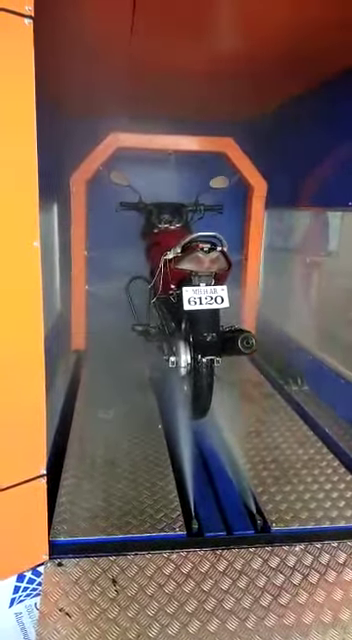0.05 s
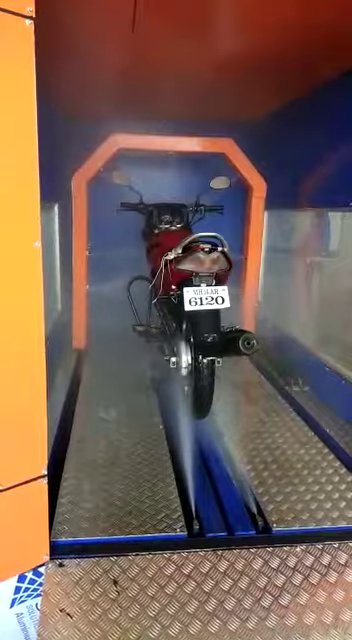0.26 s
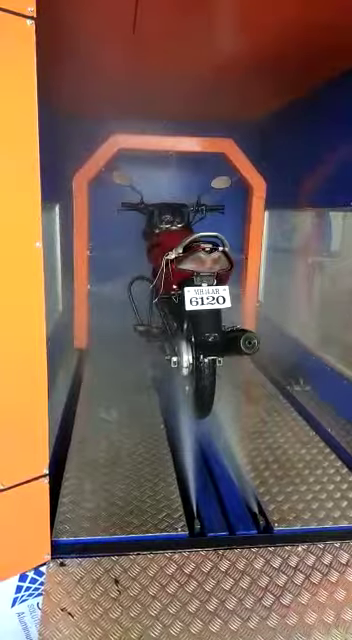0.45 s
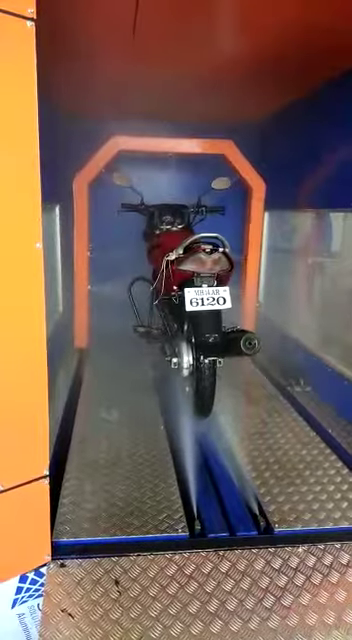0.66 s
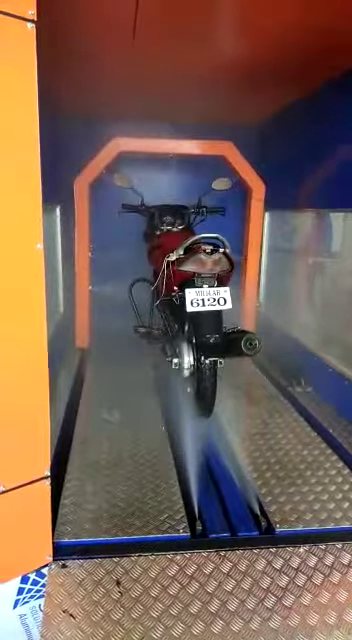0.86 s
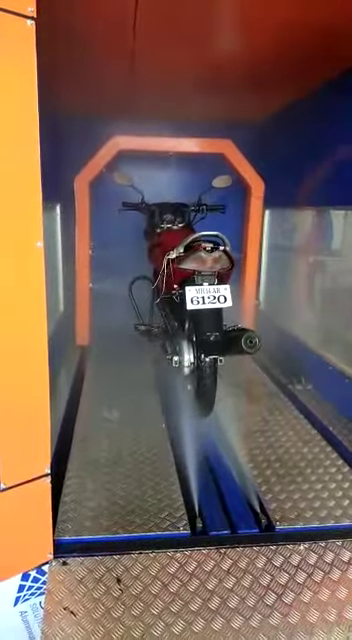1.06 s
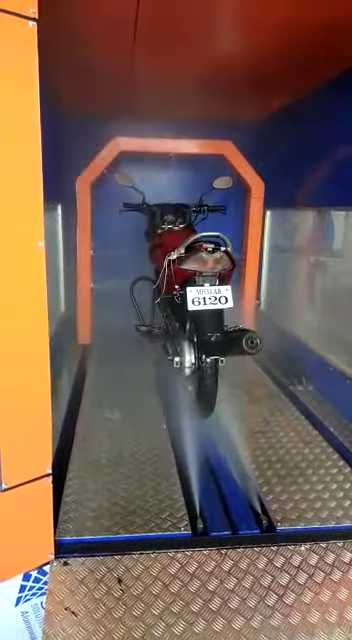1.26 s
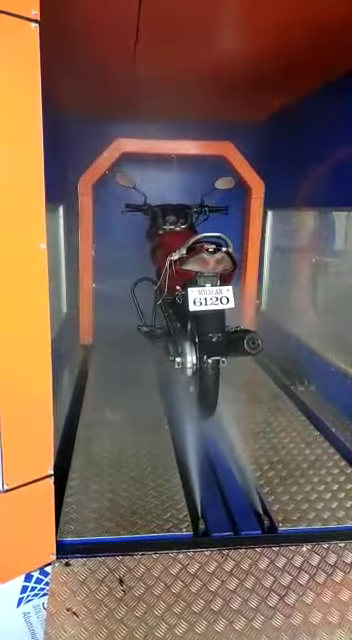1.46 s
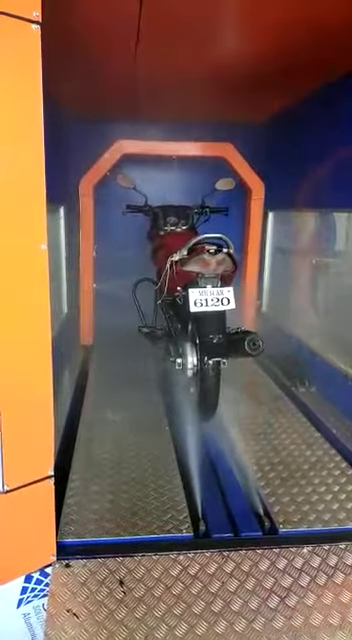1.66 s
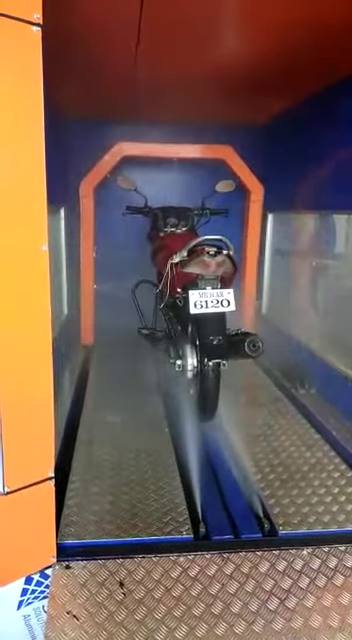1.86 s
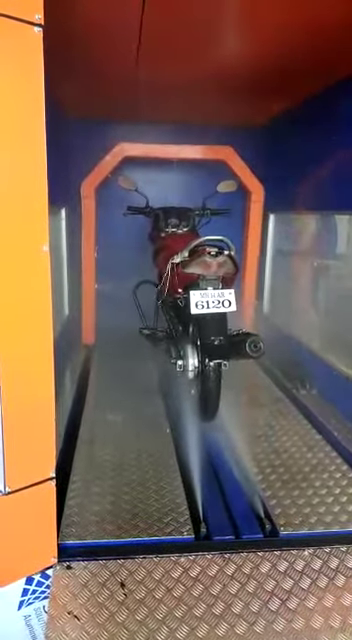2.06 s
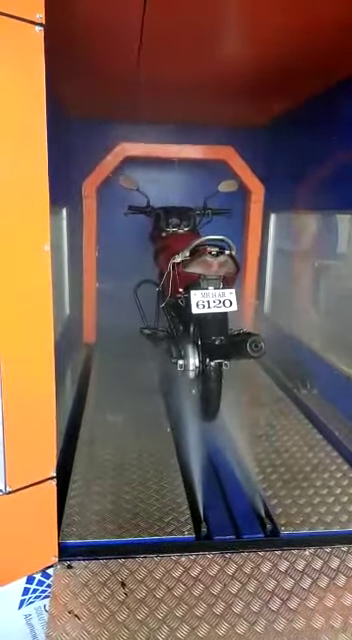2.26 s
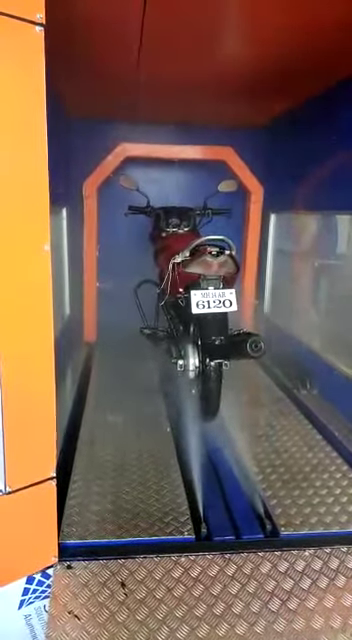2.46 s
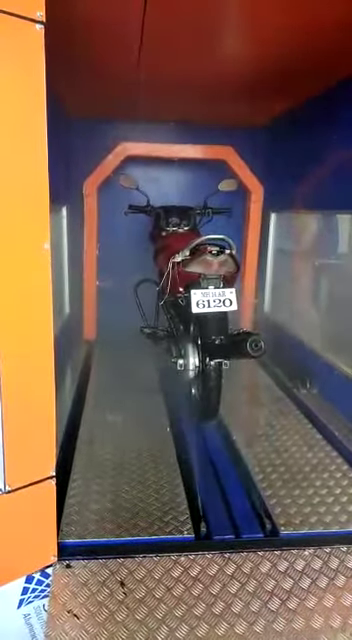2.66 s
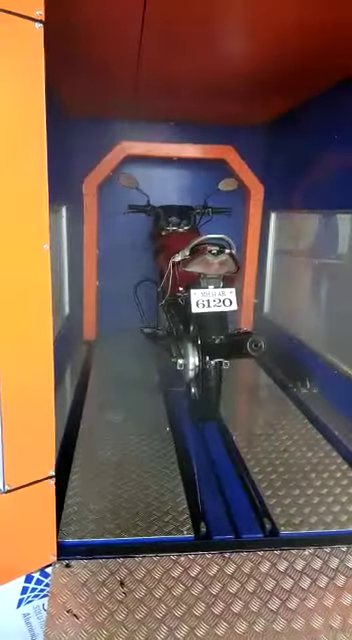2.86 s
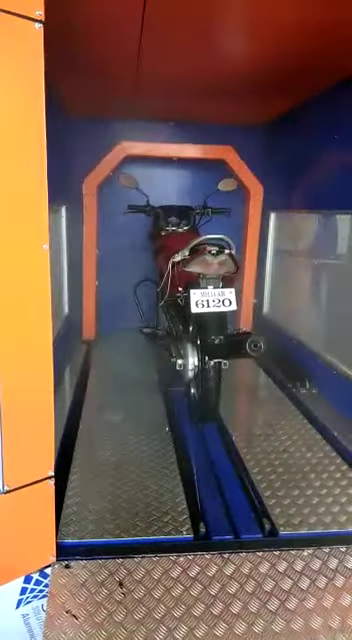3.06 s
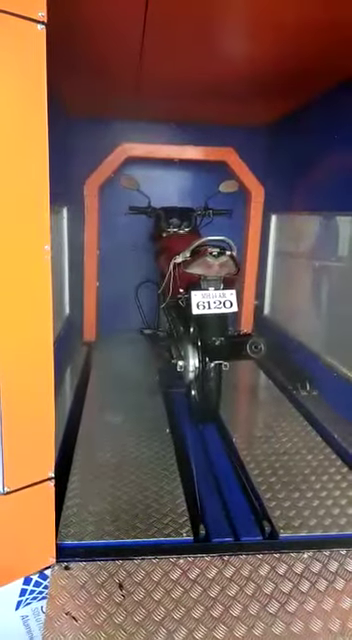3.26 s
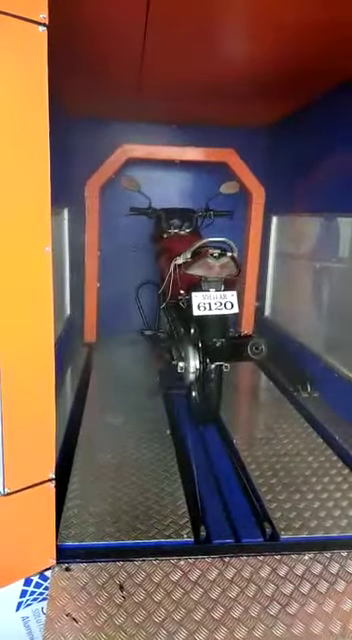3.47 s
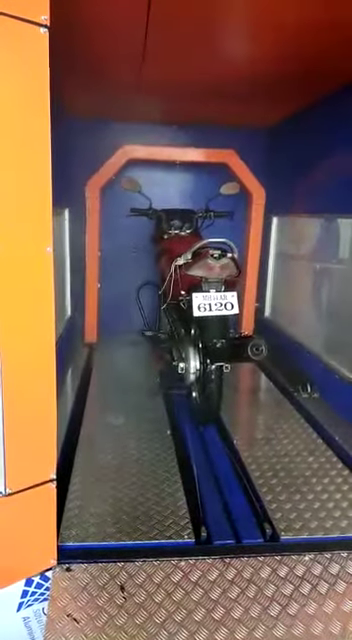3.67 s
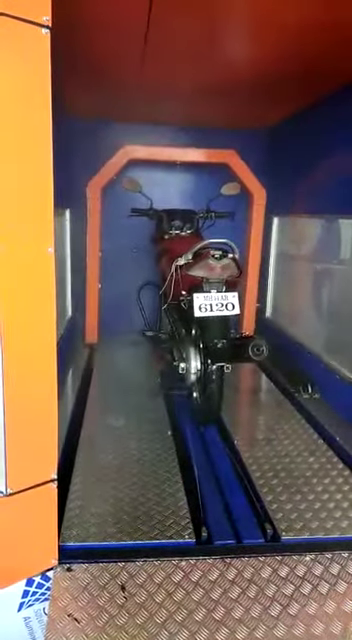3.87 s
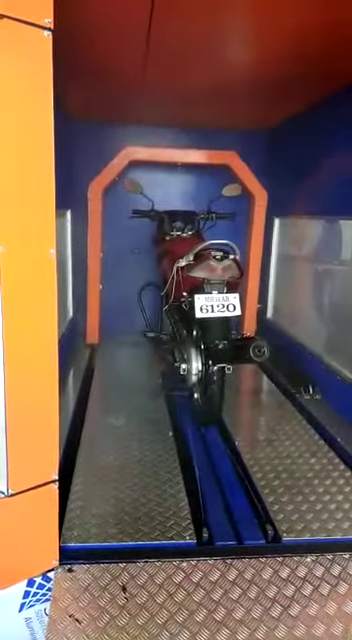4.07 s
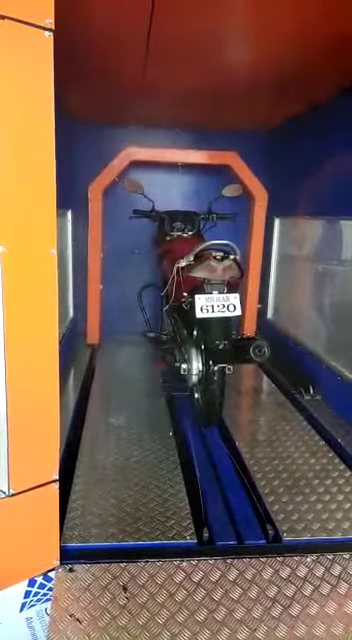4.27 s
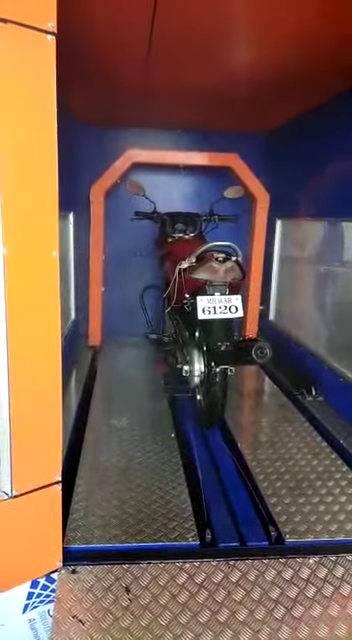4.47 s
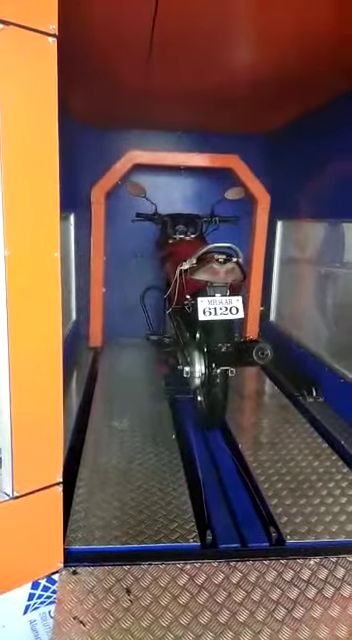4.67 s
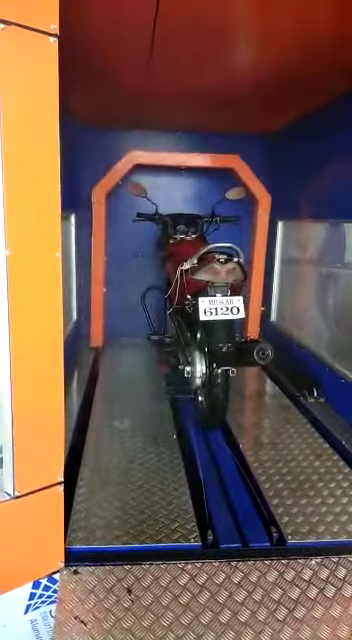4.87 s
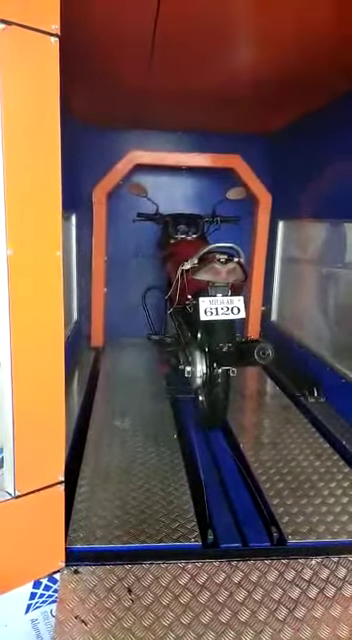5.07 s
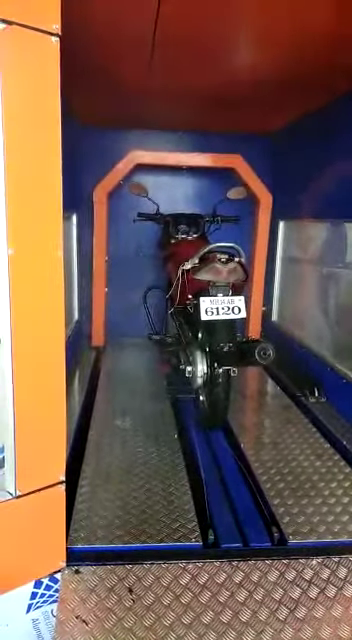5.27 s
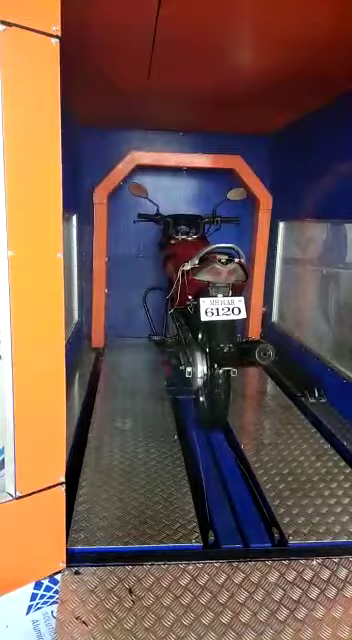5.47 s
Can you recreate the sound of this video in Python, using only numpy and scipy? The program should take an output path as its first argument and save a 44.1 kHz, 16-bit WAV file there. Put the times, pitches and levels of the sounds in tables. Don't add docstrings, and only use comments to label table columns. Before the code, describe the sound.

From 0 to 2.3 s, a motorcycle is washed in a resonant steel booth: very bright, dense jet hiss dominates, steady with slight flutter, over coarser spray drumming on metal and a low, boomy pump roar with a faint whine. At about 2.32 s a short, hard valve thump comes with a brief burst of louder hiss. The roar drops away almost at once, leaving a dull reverberant tail, while a mid-high vent blow-off fades and stops near 2.6 s. Faint pipe hums sound until 3 s. The hiss dips, recovers, then sags to its weakest at 3.3 s before returning by 3.7 s as a thin, high bleed with faint drips. A very distant fan tone swells around 4 s. Four far hammer blows on steel follow at roughly 4.1, 4.4, 4.7 and 4.9 s, the first dull, the third pinging, the last brightest, ringing through the hall until the end at 5.5 s.

```python
import sys
import numpy as np
from scipy import signal
from scipy.fft import rfft, irfft, next_fast_len
from scipy.io import wavfile
from scipy.ndimage import uniform_filter1d, map_coordinates

SR = 44100
rng = np.random.default_rng(int(sys.argv[2]) if len(sys.argv) > 2 else 0)


def undo_db(level):
    steps = np.asarray(level, float) / 20
    return 10 ** steps


def transcribe(u):
    v = np.clip(np.atleast_2d(u).T, -1, 1)
    q = np.round(v * 32767).astype(np.int16)
    wavfile.write(sys.argv[1], SR, q)


N = 242991
SHUT_S = 2.335

# (time [s], level [dB])
PRESSURE = [(0, -15.5), (2.318, -15.5), (2.328, -9.5), (2.39, -12.5), (2.49, -20), (2.62, -16),
            (2.75, -16.5), (3.08, -19.5), (3.24, -23.5), (3.33, -27.5), (3.67, -19.5), (4.1, -20),
            (4.17, -18.5), (4.7, -19), (4.83, -17.5), (5.22, -18), (5.51, -16.5)]
# (time [s], level [dB], brightness [dB], ping [dB], boom [dB])
BLOWS = [
    (4.125, -31.5, -1.5, -8, -8.5),
    (4.405, -31.5, -1, -5.5, -18),
    (4.67, -31.5, 1, 1.5, -9),
    (4.925, -31, 4, -4, -10),
]


def unit(x):
    return x / np.sqrt(np.mean(x ** 2) + 1e-20)


def since(s):
    return np.clip(np.arange(N) / SR - s, 0, None)


def along(points, hz):
    f, v = np.transpose(points)
    return np.interp(np.log(hz + 1), np.log(f + 1), v)


def curves(rows, **ends):
    s, *cols = np.transpose(rows)
    return [np.interp(np.arange(N) / SR, s, c, **ends) for c in cols]


def wobble(rate):
    knots = rng.standard_normal(int(N * rate / SR) + 4)
    return map_coordinates(knots, [np.arange(N) * rate / SR])


def peaks(modes, hz):
    return sum(undo_db(2 * db) / (1 + (2 * (hz - c) / w) ** 2) for c, w, db in modes)


def patches(pair, depth_db):
    z = signal.stft(pair, nperseg=512)[2]
    field = rng.standard_normal(z.shape[1:])
    field = uniform_filter1d(field, size=6, axis=0)
    field = uniform_filter1d(field, size=12, axis=1)
    return signal.istft(z * undo_db(depth_db * unit(field)), nperseg=512)[1][:, :N]


def rush(gain, patchy_db=None):
    # (frequency [Hz], left-right correlation [-1 to 1])
    alike = [(60, .94), (130, .95), (290, .84), (640, .46), (1410, -.05), (3100, 0), (15000, 0)]
    # (frequency [Hz], left minus right [dB])
    port_lean = [(60, 1), (110, -0.5), (200, 0), (380, 2.5), (700, -1), (1290, 0.5), (2380, -1),
                 (4400, 1.5), (8120, 2.5), (15000, 7)]
    pair = rng.standard_normal((2, N))
    if patchy_db:
        pair = patches(pair, patchy_db)
    m = next_fast_len(N + 8192, real=True)
    hz = np.fft.rfftfreq(m, 1 / SR)
    turn = np.arccos(np.clip(along(alike, hz), -1, 1)) / 2
    mid, side = rfft(pair, m) * gain(hz) * [np.cos(turn), np.sin(turn)]
    lean = undo_db(along(port_lean, hz) / 2)
    ports = irfft(np.array([(mid + side) * lean, (mid - side) / lean]), m)[:, :N]
    return ports / np.std(ports.mean(axis=0))


def nozzles():
    # (frequency [Hz], density [dB per Hz])
    jet_spectrum = [(1000, -120), (3800, -20), (6500, -15), (9000, -5.5), (10800, 1.5), (12300, 2),
                    (13700, -1.5), (14600, -5.5), (15700, -6), (17000, -11.5)]
    # (frequency [Hz], density [dB per Hz])
    bleed_spectrum = [(1000, -120), (3800, -23.5), (6500, -13.5), (8700, -8.5), (11500, 2.5), (13200, 0),
                      (15100, -4), (16000, -3.5), (17000, -14)]
    # (frequency [Hz], density [dB per Hz])
    splash_spectrum = [(710, -39), (1200, -10.5), (2660, -5), (2940, -3), (3400, -3.5), (3730, -1.5),
                       (4120, -1.5), (7500, 1), (9750, -3.5), (16500, -120)]
    # (frequency [Hz], density [dB per Hz])
    vent_spectrum = [(2000, -60), (3200, -5), (3700, 3), (5500, 1.5), (6500, -24), (9000, -40),
                     (14000, -120)]
    jets_pan_db, bleed_pan_db = -1.2, -0.05
    splash_db, drips_db, drain_s = -24.5, -33.5, .3
    vent_open_s, vent_db, vent_fade_db_per_s = 0.023, -28.5, 17
    vent_close_s, vent_close_db_per_s = 2.6, 220
    dry_s = 0.055

    hiss_db, = curves(PRESSURE)
    pressure = wobble(12)
    shut = np.clip(since(SHUT_S) / .26, 0, 1)
    jets = np.sqrt(1 - shut) * rush(lambda hz: undo_db(along(jet_spectrum, hz)), patchy_db=1.0)
    bleed = np.sqrt(shut) * rush(lambda hz: undo_db(along(bleed_spectrum, hz)), patchy_db=.5)
    pan_db = jets_pan_db + (bleed_pan_db - jets_pan_db) * shut
    pan_db = pan_db * np.array([[.5], [-.5]])
    hiss = undo_db(hiss_db + pan_db + 0.31 * pressure + 0.27 * wobble(40)) * (jets + bleed)

    wet = np.exp(-since(SHUT_S) / drain_s - since(vent_close_s) / dry_s)
    water_db = drips_db + (splash_db - drips_db) * wet
    water_db = water_db + 0.44 * (hiss_db - hiss_db[0])
    water_level = undo_db(water_db + 0.38 * pressure + 0.4 * wobble(15))
    splash = water_level * rush(lambda hz: undo_db(along(splash_spectrum, hz)), patchy_db=0.92)

    opened = np.clip(since(SHUT_S - vent_open_s) / vent_open_s, 0, 1) ** 2
    fading_db = vent_fade_db_per_s * since(SHUT_S) + vent_close_db_per_s * since(vent_close_s)
    vent_level = opened * undo_db(vent_db - fading_db)
    vent = vent_level * rush(lambda hz: undo_db(along(vent_spectrum, hz)))
    return hiss + splash + vent


def pump():
    # (frequency [Hz], density [dB per Hz])
    roar_spectrum = [(15, -63), (25, -19), (70, -23), (128, -6.5), (222, -2.5), (266, -6), (303, -0.5),
                     (398, -5), (461, -4.5), (534, -6), (978, -5), (1200, -10.5), (2000, -10.5),
                     (2600, -22), (4400, -120)]
    # (centre [Hz], width [Hz], level [dB])
    booth_modes = [(107, 6, 4), (143, 12, 2), (213, 12, 3), (233, 7, 6), (297, 7, 10), (340, 14, 4),
                   (457, 7, 9), (474, 8, 6), (511, 9, 5), (769, 10, 5), (1011, 12, 4)]
    # (frequency [Hz], level over the roar [dB])
    whine_tones = [(297.8, -12), (458, -15.5), (232.8, -16.5)]
    running_db, rundown_db = -28, -39
    kick_db, kick_s = 1.5, .03
    stop_t60, rundown_t60 = 0.16, 3.1

    after = since(SHUT_S - .01)
    kick = kick_db * np.clip(since(SHUT_S - kick_s) / kick_s, 0, 1)
    stopping = undo_db(running_db + kick - 60 * after / stop_t60)
    rundown = undo_db(rundown_db - 60 * after / rundown_t60)
    level = np.maximum(stopping, rundown)

    def boomy(hz):
        return undo_db(along(roar_spectrum, hz)) * np.sqrt(1.17 + peaks(booth_modes, hz))

    def deep(hz):
        return 1 / (1 + (hz / 170) ** 4)

    stopped = np.clip((np.arange(N) / SR - 2.325) / .03, 0, 1)
    motor = undo_db(-8.0 - 9.8 * stopped) * rush(lambda hz: boomy(hz) * np.sqrt(deep(hz)))
    drumming = undo_db(-1.2) * rush(lambda hz: boomy(hz) * np.sqrt(1 - deep(hz)))
    whine = np.zeros(N)
    for hz, db in whine_tones:
        whine += undo_db(db) * np.sin(2 * np.pi * hz * np.arange(N) / SR + 0.84 * wobble(6))
    return level * undo_db(0.056 * wobble(5.86)) * (motor + drumming + whine)


def workshop():
    # (frequency [Hz], density [dB per Hz])
    air_spectrum = [(15, -65), (25, -52), (142, -6), (178, -6), (200, -5), (409, -2.5), (589, -7.5),
                    (743, -5), (1010, -4), (2500, -11), (3250, -27), (5500, -120)]
    air_db, stir_db, stir_t60 = -45.5, -34.5, 1.73
    fill_db, fill_s = 2, 0.36
    fan_s, fan_loudest_db = 4.08, -51.5
    fan_up_s, fan_down_s = 0.61, .6

    pressure_db, = curves(PRESSURE)
    calm_db = air_db + .3 * (pressure_db - pressure_db[0])
    calm_db = calm_db + fill_db * np.clip(since(BLOWS[0][0]) / fill_s, 0, 1)
    stirred = (since(SHUT_S) > 0) * undo_db(stir_db - 60 * since(SHUT_S) / stir_t60)
    air_level = np.hypot(undo_db(calm_db), stirred) * undo_db(0.29 * wobble(5.12))
    air = air_level * rush(lambda hz: undo_db(along(air_spectrum, hz)), patchy_db=2.0)

    off = np.arange(N) / SR - fan_s
    fan_fall = np.where(off < 0, (off / fan_up_s) ** 2, np.sqrt(np.abs(off) / fan_down_s))
    fan = undo_db(fan_loudest_db - 10 * fan_fall) * rush(lambda hz: peaks([(790, 184, 0)], hz))
    return air + fan


def valve():
    # (time [s], peak [dB], thump [Hz], t60 [s])
    slams = [
        (2.3169, -8.5, 620, 0.0046),
    ]
    # (start [s], end [s], frequency [Hz], level [dB])
    hums = [
        (2.407, 2.573, 128, -47.5),
        (2.63, 2.777, 129, -50.5),
        (2.794, 3.02, 340, -47),
    ]
    now, out = np.arange(N) / SR, np.zeros(N)
    for s, db, hz, t60 in slams:
        t = since(s)
        onset = 1 - np.exp(-t / 0.00055)
        out -= undo_db(db + 8.5 - 60 * t / t60) * np.sin(2 * np.pi * hz * t) * onset
    for start, end, hz, db in hums:
        swell = np.sin(np.pi * np.clip((now - start) / (end - start), 0, 1)) ** .5
        tone = np.sin(2 * np.pi * hz * now + 0.77 * wobble(13))
        out += undo_db(db + 2 + 1.2 * wobble(25.0)) * swell * tone
    return out


def hammer():
    # (centre [Hz], width [Hz], level [dB])
    steel_modes = [(606, 94, -4), (796, 140, -5), (1030, 120, -8.5), (1490, 490, -8.5), (2000, 230, -2),
                   (2410, 330, -1)]
    # (centre [Hz], width [Hz], level [dB])
    boom_modes = [(192, 19, -5), (270.8, 3.2, 5.5), (291, 12, 1), (315, 16, 0.5), (340, 13, 0)]
    # (centre [Hz], width [Hz], level [dB])
    ping_modes = [(3510, 440, 0)]
    hall_t60 = 1.51

    def body_gain(hz):
        return np.sqrt(peaks(steel_modes, hz)) * (hz < 1300) / (1 + (480 / (hz + 1)) ** 6)

    def clang_gain(hz):
        return np.sqrt(peaks(steel_modes, hz)) * (hz >= 1300) / (1 + (hz / 3100) ** 6)

    body = rush(body_gain, patchy_db=0.7)
    clang = rush(clang_gain, patchy_db=0.6)
    boom = rush(lambda hz: peaks(boom_modes, hz) ** 0.82)
    ping = rush(lambda hz: peaks(ping_modes, hz))
    out = np.zeros((2, N))
    for s, db, bright_db, ping_db, boom_db in BLOWS:
        t = since(s)

        def fall(rise_s, longer):
            return (1 - np.exp(-t / rise_s)) * undo_db(db - 60 * t / (longer * hall_t60))

        out += undo_db(-6.0) * fall(0.021, 1.16) * body
        out += undo_db(bright_db - 4.5) * fall(0.0023, 0.77) * clang
        out += undo_db(boom_db) * fall(0.064, 1.26) * boom
        out += undo_db(ping_db - 2) * fall(0.002, 0.35) * ping
    return out


def scene():
    return nozzles() + pump() + workshop() + valve() + hammer()


def band_limit(x):
    return signal.sosfilt(signal.butter(12, 15750, fs=SR, output="sos"), x)


def record(dry):
    bass_cut = signal.butter(2, 55, "high", fs=SR, output="sos")
    thin = signal.sosfilt(bass_cut, dry)
    clipped = thin / (1 + np.abs(thin / .93) ** 10) ** (1 / 10)
    return band_limit(clipped)


dry = scene()
out = record(dry)
transcribe(out)
```